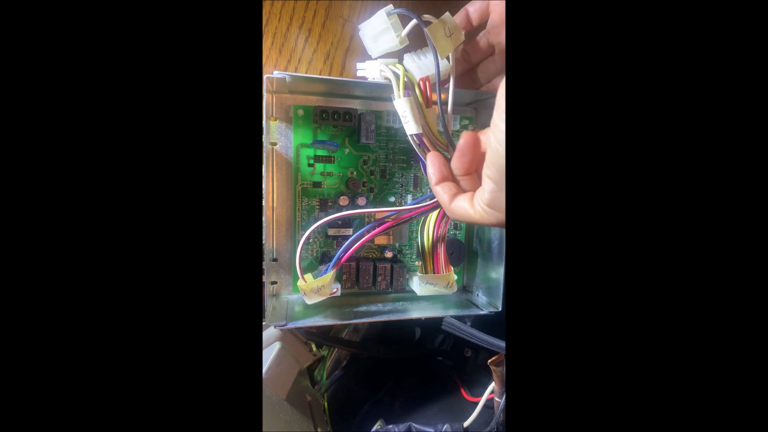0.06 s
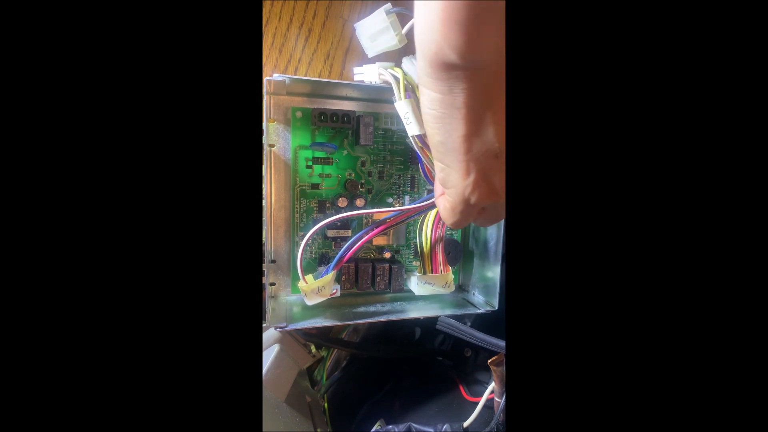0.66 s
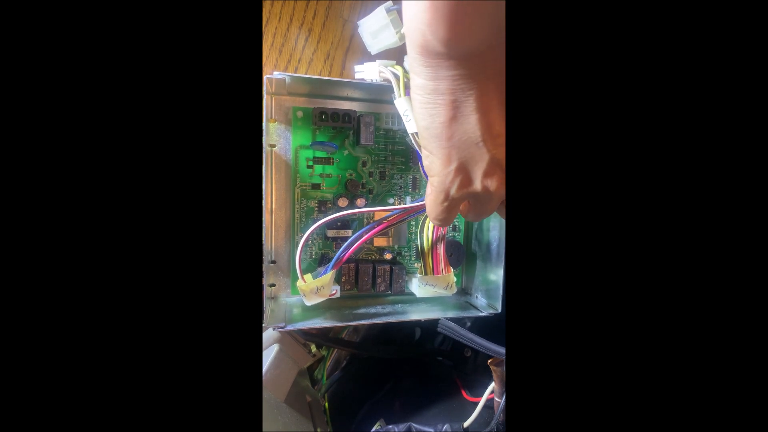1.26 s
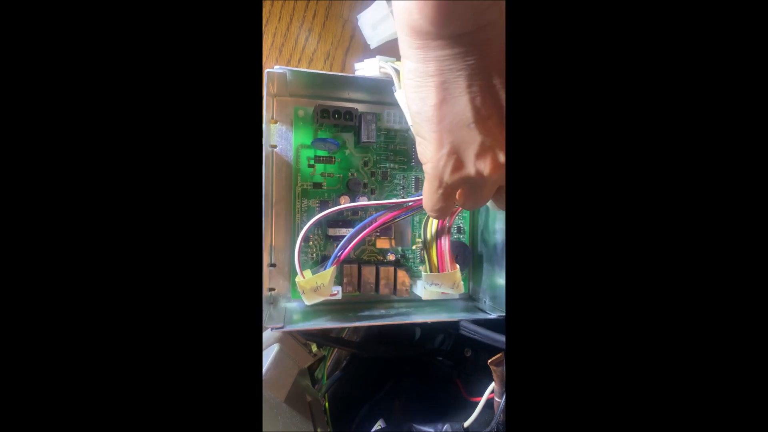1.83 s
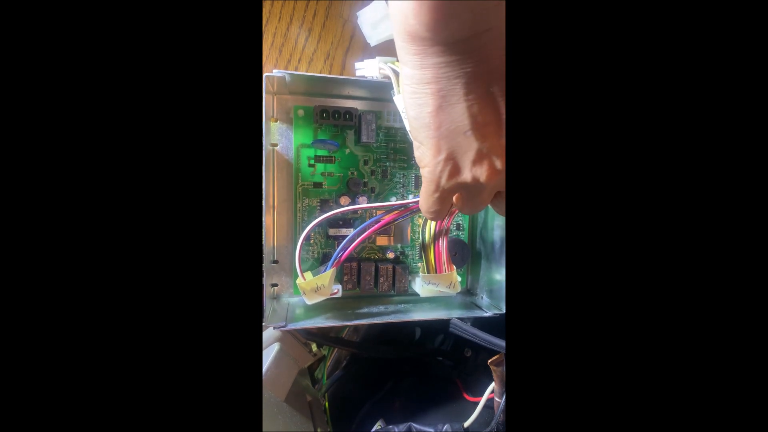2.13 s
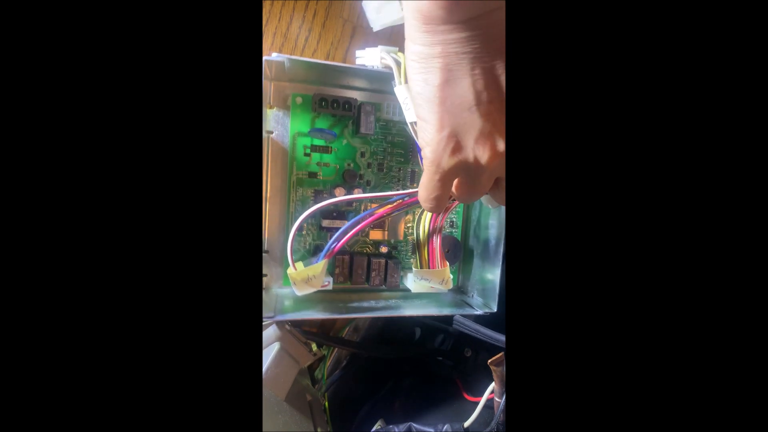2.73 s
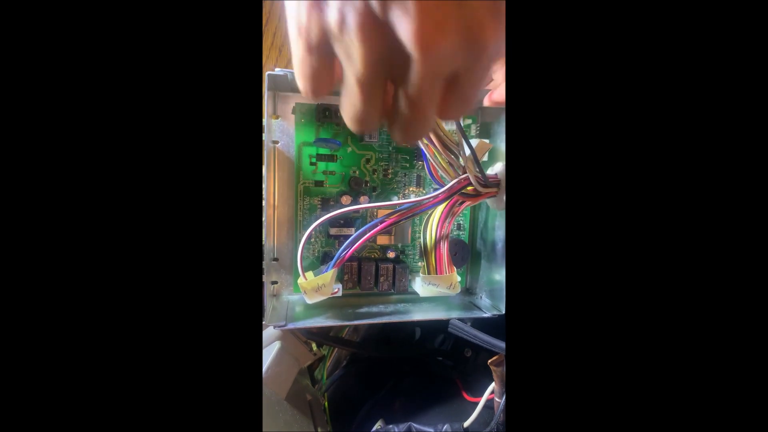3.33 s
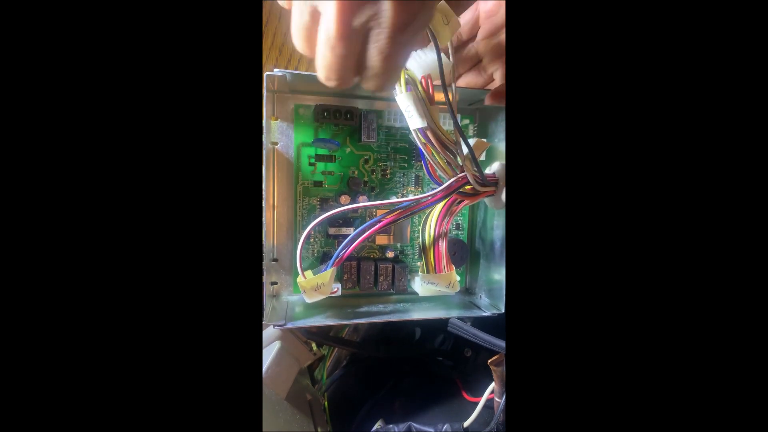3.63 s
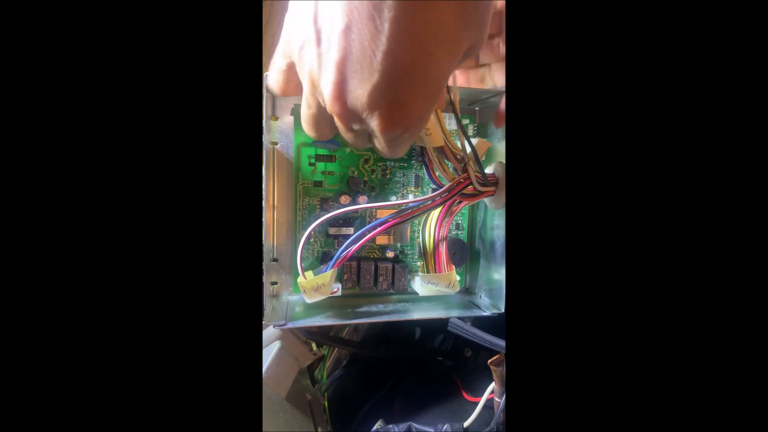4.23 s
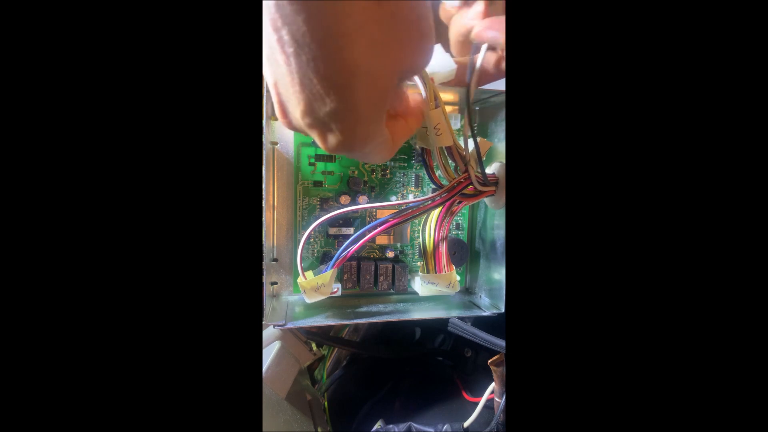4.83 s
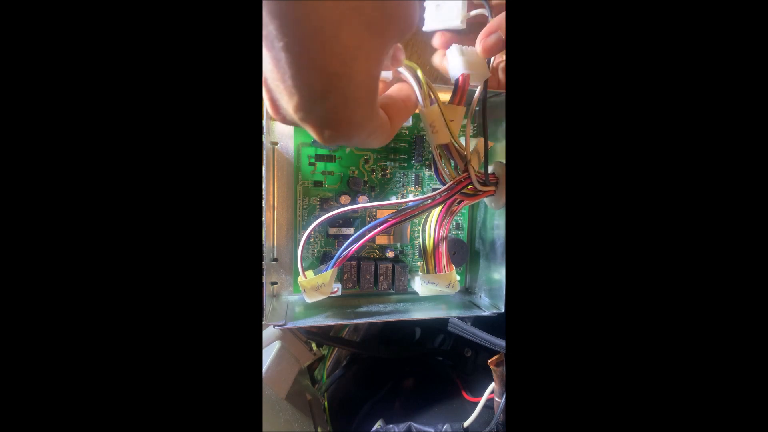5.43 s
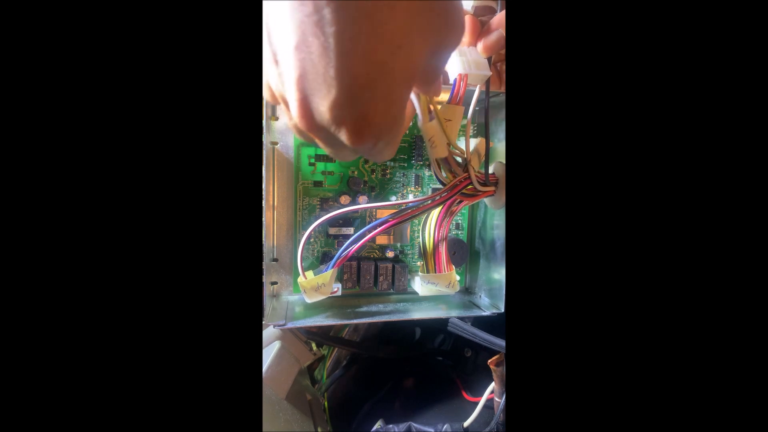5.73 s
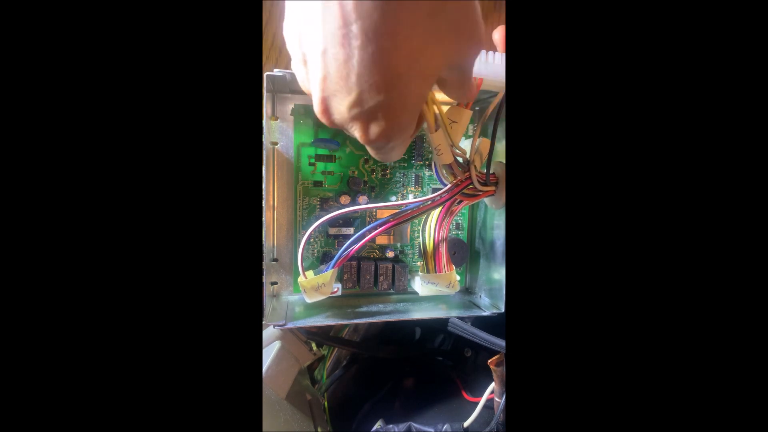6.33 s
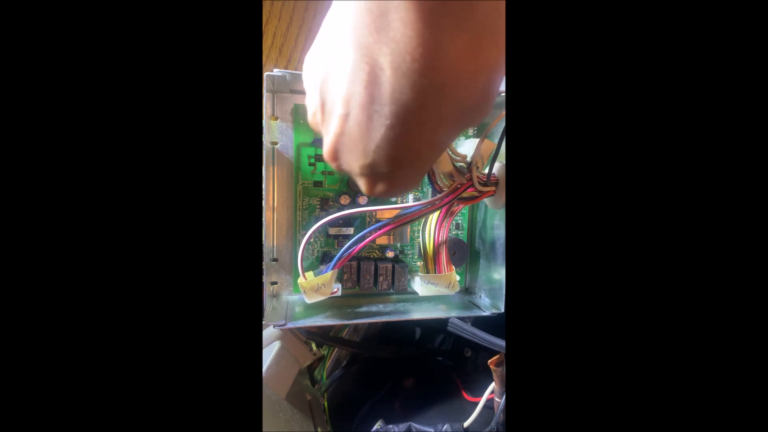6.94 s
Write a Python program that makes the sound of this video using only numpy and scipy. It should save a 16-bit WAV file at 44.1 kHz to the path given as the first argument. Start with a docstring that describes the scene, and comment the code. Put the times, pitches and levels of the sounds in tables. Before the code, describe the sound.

Hands push plastic wiring plugs onto a circuit board, with clicks, one hard snap and knocks on a steel case.

```python
"""Over a low mains hum in a small quiet room, hands work plastic wiring plugs onto a circuit board in
a sheet-steel case, close to a phone. Fingers and wires rub, housings click, and a tight plug slips in
jerks that ring the board until it snaps home at about 1.6 s. The case then takes a run of knocks.
Just after 4 s plastic squeaks on plastic between two more knocks; lighter clicks and rubs follow."""
import sys
import numpy as np
from scipy import signal
from scipy.fft import rfft, irfft, next_fast_len
from scipy.io import wavfile
from scipy.ndimage import uniform_filter1d

SR = 44100
rng = np.random.default_rng(int(sys.argv[2]) if len(sys.argv) > 2 else 0)


def persist_wave(psi):
    """Save psi, clipped to +-1, as 16-bit WAV."""
    counts = np.round(np.clip(psi, -1, 1) * 32767).astype(np.int16)
    wavfile.write(sys.argv[1], SR, np.atleast_2d(counts).T)


N = 312228
TIME = np.arange(N) / SR
HIT_TIME = np.arange(8192) / SR  # time axis of one short hit

# modes of the steel case: (frequency [Hz], level [dB], t60 [s])
CASE_MODES = [(118.2, 2.5, 0.077), (174, 5.5, 0.092), (343, -3.5, 0.027), (355, -2.5, 0.041),
              (453, -4, 0.075), (487, -5, 0.066), (666, -6, 0.07), (735, -9, 0.092), (870, -11, 0.053),
              (963, 7, 0.017)]
# EQ of a plastic contact's bright edge: (frequency [Hz], gain [dB])
PLASTIC_EDGE_EQ = [(900, -33.5), (2200, -5.5), (3100, -0.5), (4700, 3.5), (6700, 4), (8500, 1.5),
                   (10000, -1.5), (12000, 4), (14000, -5), (16000, -22)]
# EQ of its duller body: (frequency [Hz], gain [dB])
PLASTIC_BODY_EQ = [(100, -8.5), (400, -9), (700, -13), (1100, -4.5), (1700, -1), (2400, -8), (3500, -14),
                   (6000, -35.5)]


def undb(db):
    """Decibels to gain."""
    return 10 ** (np.asarray(db) / 20)


def colour(x, points):
    """Minimum-phase EQ through the points (frequency [Hz], gain [dB])."""
    hz, db = np.transpose(points)
    size = 2 * next_fast_len(x.shape[-1])
    log_hz = np.log(np.fft.rfftfreq(size, 1 / SR) + 1)
    cepstrum = irfft(np.log(undb(np.interp(log_hz, np.log(hz), db))))
    cepstrum[1:size // 2] *= 2
    cepstrum[size // 2 + 1:] = 0
    return irfft(rfft(x, size) * np.exp(rfft(cepstrum)))[..., :x.shape[-1]]


def fade(t, t60):
    """Exponential decay, 60 dB down after t60 seconds."""
    return np.exp(-np.log(1000) * t / t60)


def level(x, db):
    """Set the RMS level."""
    return x * undb(db) / np.sqrt(np.mean(x ** 2))


def peak(x, db):
    """Set the RMS level of the loudest 4 ms."""
    return x * undb(db) / np.sqrt(uniform_filter1d(x ** 2, 176, mode="constant").max())


def add(track, s, x):
    """Mix a sound in at s seconds."""
    i = max(int(s * SR), 0)
    track[i:i + len(x)] += x[:N - i]


def drift(eq):
    """Random modulation of unit RMS, its speed set by the EQ."""
    return level(colour(rng.standard_normal(N), eq), 0)


def strike(modes, scatter_db, detune):
    """Damped modes, one a row; the grip shifts their levels and pitches at each blow."""
    chance = rng.standard_normal((len(modes), 2))
    partials = []
    for (hz, db, t60), (louder, sharper) in zip(modes, chance):
        tone = np.sin(2 * np.pi * hz * (1 + detune * sharper) * HIT_TIME)
        partials.append(undb(db + scatter_db * louder) * fade(HIT_TIME, t60) * tone)
    return np.array(partials)


def crack(eq, db, snap_t60, chatter_db, chatter_t60):
    """A plastic contact: a snap, softer in attack the longer it lasts, then the parts chatter briefly."""
    decay = fade(HIT_TIME, snap_t60) + undb(chatter_db) * fade(HIT_TIME, chatter_t60)
    attack = 1 - fade(HIT_TIME, snap_t60 / 2)
    return peak(colour(rng.standard_normal(len(HIT_TIME)) * attack * decay, eq), db)


def housing_ring(x):
    """The narrow resonances of the plug housings, driven by x."""
    # housing resonances: (frequency [Hz], bandwidth [Hz], gain [dB])
    resonances = [(2324, 29, -2.5), (3410, 18, 0), (3594, 54, 3), (4323, 32, 1), (4800, 35, 1),
                  (5380, 100, 1), (6430, 130, 5), (7120, 63, 1), (8340, 57, 2)]
    return sum(undb(db) * signal.lfilter(*signal.iirpeak(hz, hz / width, fs=SR), x)
               for hz, width, db in resonances)


def hollow(x, ring_db):
    """Contact noise, heard directly and ringing in the housings."""
    return x + undb(ring_db) * housing_ring(x)


def room_tone():
    """The bed: mains hum that wavers a little, low room rumble and faint hiss."""
    # mains partials: (frequency [Hz], level [dB])
    partials = [(59.4, -62.5), (119.5, -80)]
    # EQ of the rumble and hiss: (frequency [Hz], gain [dB])
    air_eq = [(20, -7), (80, -3), (170, -3), (300, -20.5), (1000, -35), (3000, -42), (7500, -45),
              (9800, -50), (12500, -40.5), (16000, -59)]
    hum = sum(level(np.sin(2 * np.pi * (hz * TIME + rng.random())), db) for hz, db in partials)
    waver_db = 0.68 * drift([(3, 0), (8, -12), (30, -60)])
    centre, left, right = colour(rng.standard_normal((3, N)), air_eq)
    wide = colour(np.array([left, right]), [(120, -11.5), (1000, 3.0)])
    return hum * undb(waver_db) + level(centre, -77) + level(wide, -71)


def reverb(x):
    """Quick bright reflections inside the steel case, then the room, where the low mids linger."""
    # room tail by band: (centre [Hz], t60 [s], level [dB])
    bands = [(120, 0.58, -2.5), (300, 0.66, -6), (443, 0.61, -6.5), (638.7, 0.33, -3.5), (1001.7, 0.26, -7),
             (1930, 0.15, -8), (5760, 0.35, -12), (13000, 0.048, -6)]
    centres, t60s, dbs = np.transpose(bands)
    t = TIME[:SR]
    hz = np.fft.rfftfreq(SR, 1 / SR) + 1
    shared = np.clip(1 - hz / 650, 0, 1)  # long waves reach both microphone ports alike
    noise = rfft(rng.standard_normal((2, SR)))
    noise = (noise + shared * noise[::-1]) / np.sqrt(1 + shared ** 2)
    tail = 0
    for share, t60, db in zip(np.eye(len(bands)), t60s, dbs):
        envelope = fade(t, t60) * (1 - fade(t, 0.013))
        band = irfft(noise * np.interp(np.log(hz), np.log(centres), share), SR)
        tail = tail + undb(db) * band * envelope / np.linalg.norm(envelope)
    envelope = fade(t, 0.049) * (1 - fade(t, 0.0072))
    early = rng.standard_normal((2, SR)) * envelope / np.linalg.norm(envelope)
    early = colour(early, [(300, -7.5), (1500, -6), (4000, -2.0)])
    return signal.fftconvolve(x[None], early + tail, axes=1)[:, :N]


def mic_ports(x):
    """Stereo image: the work lies nearer the left port, while the right one hears more of the mids."""
    # phase between the ports: (frequency [Hz], left lead [rad])
    phase = [(0, 0), (430, 0), (1030, 0.88), (1810, 0.45), (2760, 2), (4220, 1.82), (6370, 6.5), (8610, 8),
             (10200, 9.5), (12000, 15), (14600, 9.5)]
    # balance between the ports: (frequency [Hz], left minus right [dB])
    balance = [(60, -0.5), (110, 0), (200, -5), (380, 1.5), (700, -6.5), (1290, -3), (2000, -3.5),
               (4400, -3), (8120, 0.5), (15000, -1)]
    hz = np.fft.rfftfreq(2 * N, 1 / SR)
    lead = np.interp(hz, *np.transpose(phase))
    tilt = undb(np.interp(hz, *np.transpose(balance)) / 2)
    return irfft(rfft(x, 2 * N) * np.array([tilt, np.exp(-1j * lead) / tilt]))[:, :N]


def friction(catches_per_s, spread_db, hiss_db):
    """Many tiny catches of uneven size over a smooth hiss."""
    sizes = undb(spread_db * np.minimum(rng.exponential(size=N), 4)) * rng.choice([-1, 1], N)
    catches = sizes * (rng.random(N) < catches_per_s / SR)
    return level(catches, 0) + undb(hiss_db) * rng.standard_normal(N)


def effort():
    """Pressure and wire-bending envelopes: each stroke builds, lets go and settles over a light touch."""
    # finger strokes: (start [s], end [s], pressure [dB], wire rustle [dB])
    strokes = [(0.176, 0.277, -49, -63), (0.395, 0.425, -59, -60), (0.584, 0.74, -44, -56),
               (0.814, 0.938, -55.5, -64.5), (1.013, 1.11, -48, -62), (1.431, 1.586, -40, -60),
               (1.645, 1.7, -49, -44), (1.812, 1.893, -48, -51), (1.945, 2.029, -54, -54.5),
               (2.381, 2.432, -53.5, -74.5), (2.678, 2.745, -50.5, -52), (3.144, 3.416, -54.5, -64),
               (4.038, 4.137, -56, -62.5), (4.152, 4.207, -40, -61), (4.552, 4.85, -66.5, -61.5),
               (5.476, 5.572, -78, -59.5), (5.82, 5.89, -67, -70), (6.425, 6.602, -69, -68),
               (6.792, 6.87, -66.5, -66), (7.002, 7.082, -62.5, -60.5)]
    resting_db = (-92, -97)  # pressure, wire rustle
    wander_db = 5.5 * drift([(4, 0), (12, -15), (40, -60)])
    out = undb(resting_db)[:, None] * undb(wander_db)
    for start, end, *dbs in strokes:
        corners = [start - 0.005, start + 0.016, end - 0.008, end + 0.0083]
        press = np.interp(TIME, corners, [0.0046, 0.53, 0.91, 0])
        # the wires keep rubbing as the hand eases off
        settle = undb(-15) * (TIME > end) * fade(np.abs(TIME - end), t60=0.22)
        out = out + undb(dbs)[:, None] * (press + settle)
    return out


def hands():
    """Pressure scrapes the board and makes the case rumble; the wires rustle as they bend."""
    # the case under a sliding finger: (frequency [Hz], gain [dB])
    rumble_eq = [(60, -12), (170, -5), (260, 0.5), (400, 4), (520, -1), (900, -17)]
    # board scrape: (frequency [Hz], gain [dB])
    scrape_eq = [(300, -13), (700, -9), (1050, 2), (1300, -2.5), (1650, 1.5), (2300, -10), (3300, -16),
                 (6000, -38.5)]
    # wire rustle: (frequency [Hz], gain [dB])
    rustle_eq = [(1200, -21), (2800, -5), (6500, -0.5), (8500, -4), (10000, -3), (12500, -2.5), (14200, -7),
                 (16000, -27.5)]
    firm_db, rumble_growth = -43.5, 1.137  # a firm stroke; dB of rumble per dB of pressure
    pressure, bending = effort()
    low_modes = [mode for mode in CASE_MODES if mode[0] < 520]
    case = colour(strike(low_modes, scatter_db=5.0, detune=0.026).sum(0), rumble_eq)
    drag = friction(catches_per_s=280, spread_db=-1.0, hiss_db=-8.0)
    rumble = level(signal.fftconvolve(drag, case)[:N], -40)
    scrape = colour(friction(catches_per_s=430, spread_db=4.5, hiss_db=-5.0), scrape_eq)
    wires = colour(friction(catches_per_s=290, spread_db=5.5, hiss_db=-3.5), rustle_eq)
    rustle = level(hollow(wires, ring_db=3.0), -1.6)
    rumble_gain = (pressure / undb(firm_db)) ** rumble_growth
    return rumble_gain * rumble + pressure * level(scrape, -3.0) + bending * rustle


def scuffs():
    """A fingertip scuffs a housing: short grainy rubs, each with the colour of the touched part."""
    # scuffs: (time [s], length [s], level [dB], centre [Hz])
    cues = [(1.252, 0.033, -59, 1530), (3.796, 0.014, -63.5, 947), (6.164, 0.053, -56.5, 1474),
            (6.339, 0.0195, -56, 1210), (6.784, 0.024, -55, 1277)]
    out = np.zeros(N)
    for s, length_s, db, hz in cues:
        swell = np.sin(np.pi * np.minimum(HIT_TIME / length_s, 1))
        rub = rng.laplace(size=len(HIT_TIME)) * swell
        add(out, s, peak(colour(rub, [(hz / 2, -14), (hz, 0), (2 * hz, -17), (10 * hz, -40)]), db))
    return out


def squeak():
    """One housing slides over another and sings until they stick; the rub rings its walls roughly."""
    # swell and fall of the squeak: (time [s], level [dB])
    contour = [(4.11, -46), (4.156, -62), (4.195, -36.5), (4.213, -36.5), (4.232, -44.5), (4.256, -50)]
    times, dbs = np.transpose(contour)
    gate = np.interp(TIME, [times[0], times[0] + 0.023, times[-1], times[-1] + 0.006], [0, 1, 1, 0])
    pitch_hz = 1710 * (1 + 0.003 * drift([(150, 1), (600, -46)]))
    tone = level(np.sin(2 * np.pi * np.cumsum(pitch_hz) / SR), 0)
    out = undb(np.interp(TIME, times, dbs)) * gate * tone
    rasp_at_s, rise_s = 4.148, 0.019
    rub = np.minimum(HIT_TIME / rise_s, 1) * fade(np.maximum(HIT_TIME - rise_s, 0), t60=0.2)
    rasp = housing_ring(rub * rng.standard_normal(len(HIT_TIME)))
    add(out, rasp_at_s, peak(colour(rasp, [(3700, 4), (6400, -7)]), -48.5))
    return out


def pings():
    """Touched parts ring out briefly and are choked by the hand."""
    # pings: (time [s], pitch [Hz], level [dB], t60 [s], hold before the choke [s])
    cues = [(1.778, 793, -28, 0.08, 0.0084), (3.099, 612, -35, 0.055, .04),
            (3.227, 777, -32.5, 0.34, 0.014), (4.353, 3690, -49.5, 0.24, 0.042)]
    out = np.zeros(N)
    for s, hz, db, t60, hold_s in cues:
        tone = np.sin(2 * np.pi * hz * HIT_TIME) * fade(HIT_TIME, t60)
        attack = 1 - fade(HIT_TIME, 0.022)
        choke = fade(np.maximum(HIT_TIME - hold_s, 0), 0.035)
        add(out, s, peak(tone * attack * choke, db))
    return out


def knocks():
    """Blows on the case: the box thumps, its panels ring, and hard contact adds a bright-edged clack."""
    # knocks: (time [s], panel [dB], thump [dB], contact [dB])
    cues = [(1.772, -32, -43.5, -32), (1.778, -22.5, -35, -49), (1.958, -31, -43, -37),
            (1.989, -41.5, -28.5, -41.5), (2.008, -31, -53.5, -52.5), (2.025, -42, -36.5, -49.5),
            (2.309, -31.5, -40, -45), (2.449, -41.5, -51.5, -53), (2.721, -53, -38.5, -52),
            (3.099, -32.5, -65, -42.5), (3.169, -41, -38.5, -40.5), (3.228, -28.5, -43.5, -36),
            (3.333, -33, -38, -62.5), (3.396, -25.5, -33, -35), (3.648, -64, -49.5, -68),
            (3.805, -66, -58.5, -89), (4.188, -31.5, -44, -45), (4.353, -28.5, -37, -36),
            (5.6, -51.5, -51.5, -55)]
    out = np.zeros(N)
    whole_box = np.array(CASE_MODES)[:, 0] < 270
    attack = 1 - fade(HIT_TIME, 0.031)  # big surfaces take a few milliseconds to get moving
    for s, panel_db, thump_db, contact_db in cues:
        modes = strike(CASE_MODES, scatter_db=2.5, detune=0.016) * attack
        thump = peak(modes[whole_box].sum(0), thump_db + 3.5)
        panels = peak(modes[~whole_box].sum(0), panel_db - 3)
        clack = crack(PLASTIC_BODY_EQ, contact_db, snap_t60=0.037, chatter_db=-10.5, chatter_t60=0.19)
        edge = crack(PLASTIC_EDGE_EQ, contact_db - 17, snap_t60=0.0049, chatter_db=-13, chatter_t60=0.114)
        add(out, s, thump + panels + clack + edge)
    return out


def clicks():
    """Housings tap each other and latches snap; a faint bright tick leads into each snap."""
    # clicks: (time [s], treble [dB], body [dB])
    cues = [(0.047, -63.5, -52), (0.18, -43.5, -70), (0.209, -46.5, -70), (0.5625, -46, -48),
            (0.606, -46, -52), (1.041, -46.5, -57), (1.325, -66.5, -63), (1.558, -20, -19.5),
            (1.6395, -28, -23.5), (1.666, -16, -27), (1.744, -44.5, -39.5), (2.532, -61.5, -54),
            (2.6192, -44, -50.5), (2.81, -46, -55), (2.8482, -52, -52.5), (3.0964, -32.5, -30),
            (3.159, -38.5, -37.5), (3.203, -39, -40), (3.301, -47.5, -53), (4.352, -36, -40),
            (4.563, -53.5, -63), (4.643, -50, -75), (4.828, -45.5, -58.5), (4.992, -56, -77),
            (5.029, -43.5, -66), (5.185, -53.5, -67.5), (5.448, -46.5, -59), (5.465, -27.5, -51.5),
            (5.8814, -38, -44), (6.1465, -47.5, -59.5), (6.372, -49.5, -57), (6.494, -52, -58),
            (6.533, -44.5, -58.5), (6.56, -45, -73), (6.7, -54, -68), (6.9542, -56, -69.5),
            (7.025, -50, -55)]
    out = np.zeros(N)
    for s, treble_db, body_db in cues:
        lead_in = crack(PLASTIC_EDGE_EQ, treble_db - 16.5,
                        snap_t60=0.022, chatter_db=-24, chatter_t60=0.06)
        snap = crack(PLASTIC_EDGE_EQ, treble_db - 2.5, snap_t60=0.0052, chatter_db=-26, chatter_t60=0.12)
        body = crack(PLASTIC_BODY_EQ, body_db - 3, snap_t60=0.057, chatter_db=-20.5, chatter_t60=0.13)
        add(out, s - 0.0038, lead_in)
        add(out, s, snap + body)
    return out


def disperse(x, lag_s):
    """Bending waves carry highs faster than lows: a falling chirp whose length scales with lag_s."""
    hz = np.fft.rfftfreq(2 * len(x), 1 / SR)
    turns = lag_s * np.sqrt(1000) * (2 * np.sqrt(hz) - hz / np.sqrt(SR / 2))
    return irfft(rfft(x, 2 * len(x)) * np.exp(-2j * np.pi * turns))[:len(x)]


def jerk(db):
    """A plug slips: a chirp runs through the board, and the contact cracks more the harder it stuck."""
    # circuit board modes: (frequency [Hz], level [dB], t60 [s])
    board_modes = [(457, 5, 0.075), (1057, 8.5, 0.03), (1430, 5, 0.065), (1460, 17.5, 0.0037),
                   (1637, 8.5, 0.042), (2150, 1, 0.01), (2600, -7, 0.027)]
    hard_slip_db, crack_growth = -18.5, 1.3  # a hard jerk; dB of crack per dB of jerk
    board = disperse(strike(board_modes, scatter_db=3.0, detune=0.03).sum(0), lag_s=0.004)
    crack_db = -31 + crack_growth * (db - hard_slip_db)
    contact = crack(PLASTIC_EDGE_EQ, crack_db, snap_t60=0.02, chatter_db=-17, chatter_t60=0.11)
    return peak(board, db - 0.5) + contact


def slips():
    """A tight plug sticks and slips: single jerks, and one push where they come faster and harder."""
    # single jerks in the socket: (time [s], level [dB])
    cues = [(0.243, -43), (0.254, -36), (0.345, -48), (1.055, -39.5), (1.081, -30), (1.444, -22.5),
            (1.508, -19.5), (1.532, -18), (1.554, -20), (1.571, -26), (1.618, -27), (2.687, -51),
            (2.764, -47.5), (2.786, -37), (2.921, -48.5), (3.217, -37.5), (4.522, -54.5), (5.578, -42.5)]
    # start and end of the long push: (time [s], gap between jerks [s], level [dB])
    push = [(0.578, 0.0145, -37.5), (0.735, 0.0095, -30)]
    out = np.zeros(N)
    for s, db in cues:
        add(out, s, jerk(db))
    times, gaps, dbs = np.transpose(push)
    s = times[0]
    for late, hard in rng.standard_normal((32, 2)):
        if s < times[-1]:
            add(out, s, jerk(np.interp(s, times, dbs) + 1.3 * hard))
        s += np.interp(s, times, gaps) * (1 + 0.24 * late)
    return out


def snap_home():
    """The plug seats with one hard, dry clack."""
    # modes of the clack: (frequency [Hz], level [dB], t60 [s])
    clack_modes = [(2030, 1, 0.0052), (7000, -5, 0.0014)]
    clack = strike(clack_modes, scatter_db=-1.5, detune=0).sum(0)
    out = np.zeros(N)
    add(out, 1.5594, peak(clack, -14.5))
    return out


def scene():
    """All the handling, heard directly and through the room, over the hum."""
    contacts = hollow(clicks() + slips() + knocks() + snap_home(), ring_db=-7.0)
    handling = contacts + pings() + squeak() + scuffs() + hands()
    # the deep bass stays faint
    handling = colour(handling, [(30, -5.5), (140, -5.5), (400, -0.5)])
    return mic_ports(handling) + reverb(handling) + room_tone()


def record(dry):
    """The phone cuts the top steeply above 16 kHz."""
    return signal.sosfilt(signal.ellip(8, 0.2, 70, 16000, fs=SR, output="sos"), dry)


dry = scene()
out = record(dry)
persist_wave(out)
```